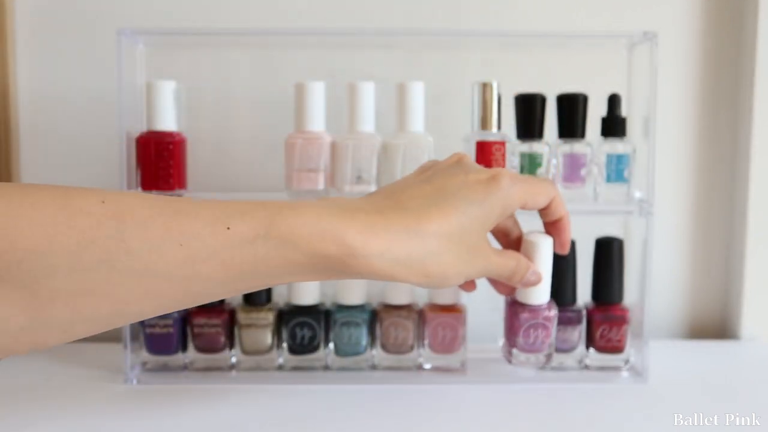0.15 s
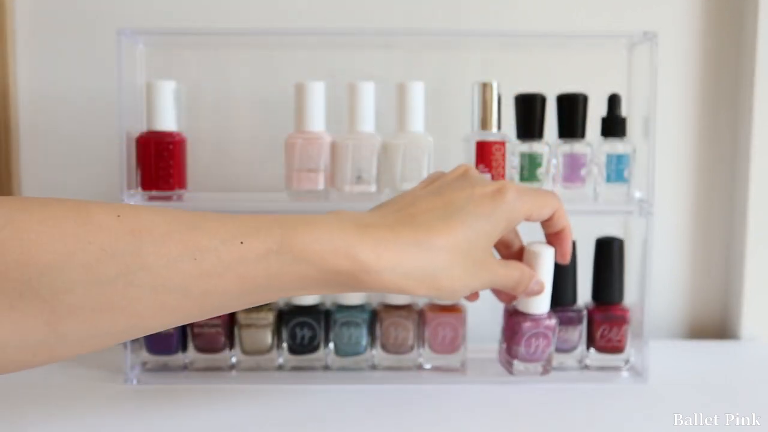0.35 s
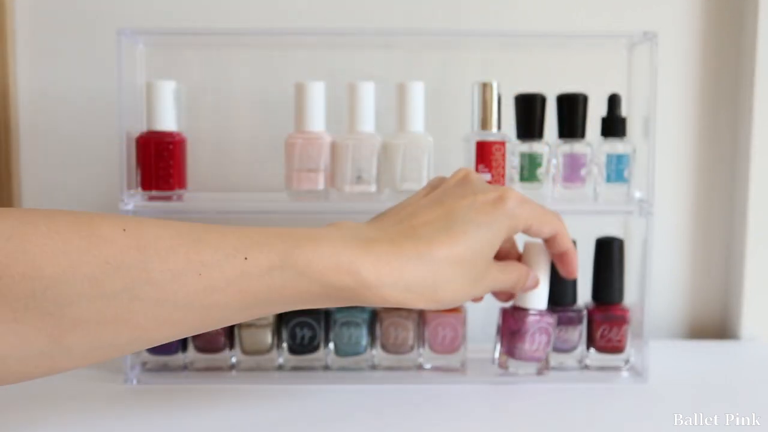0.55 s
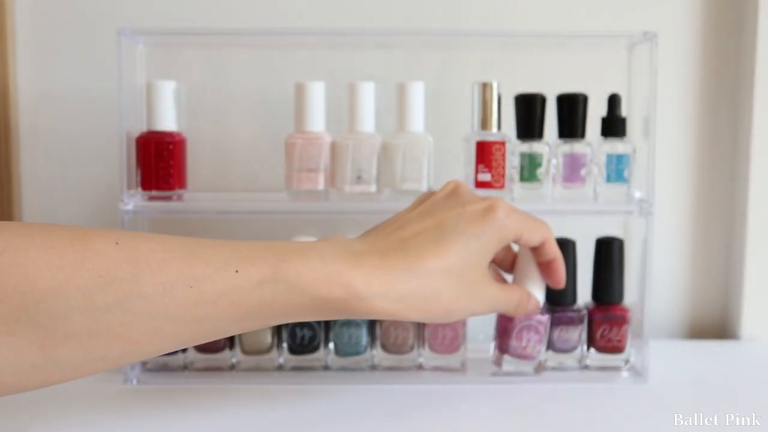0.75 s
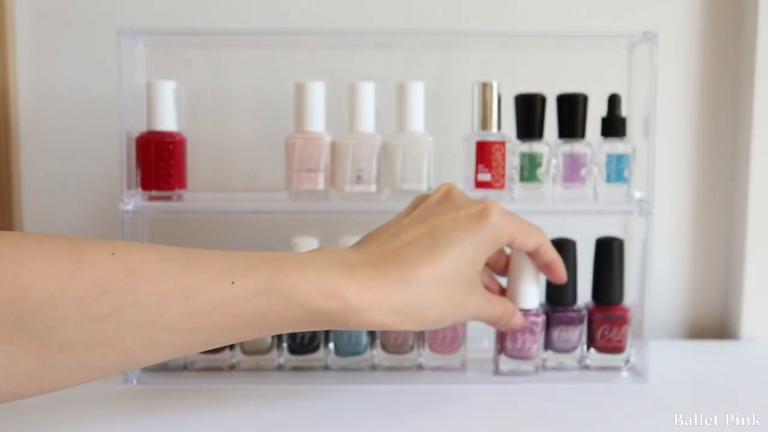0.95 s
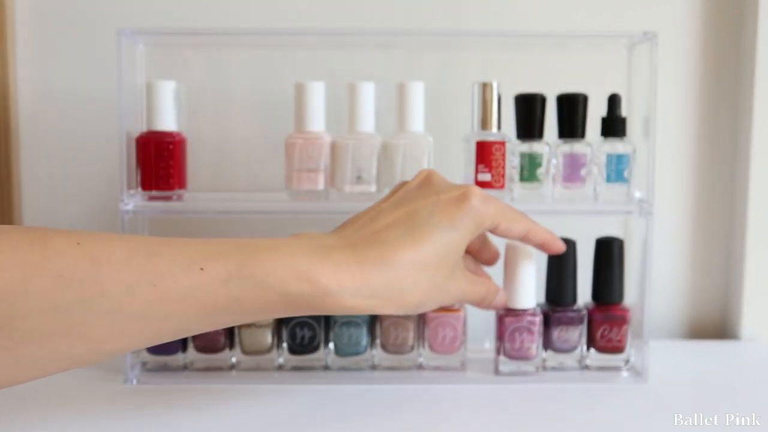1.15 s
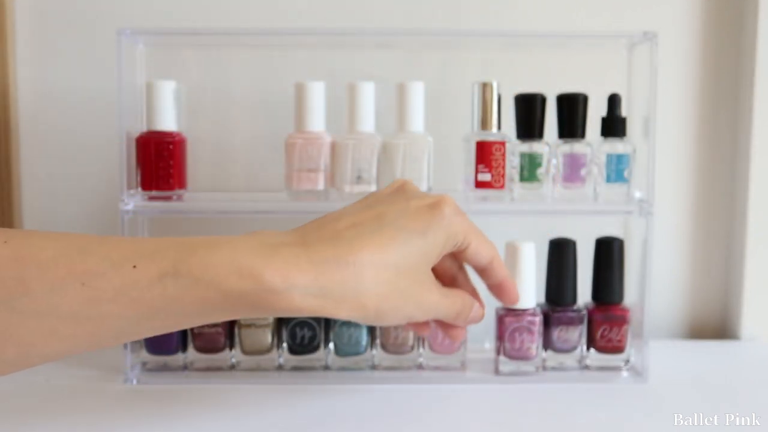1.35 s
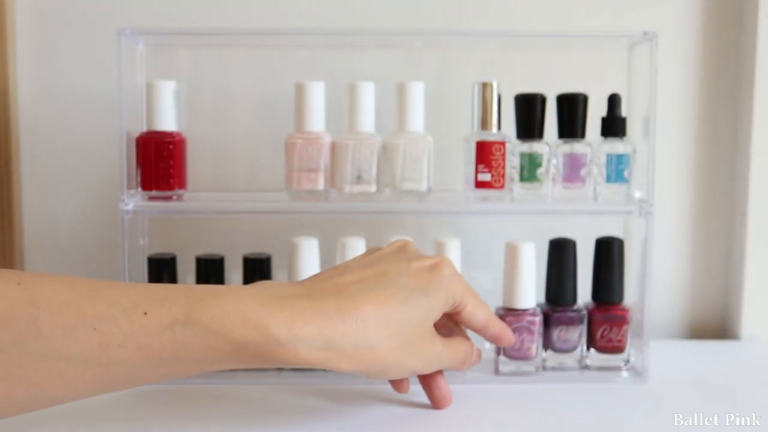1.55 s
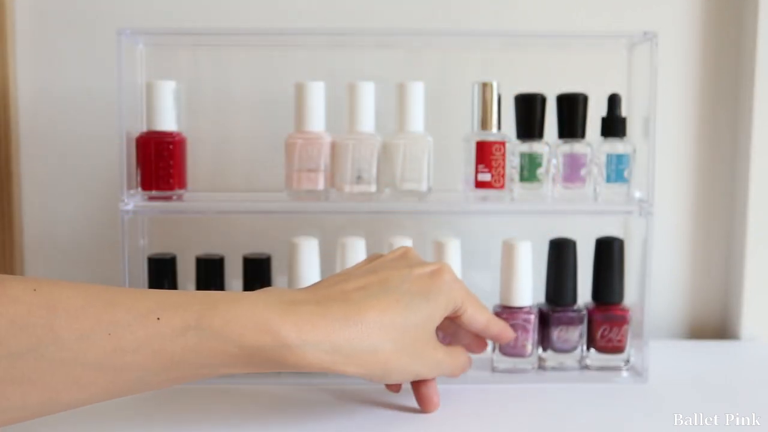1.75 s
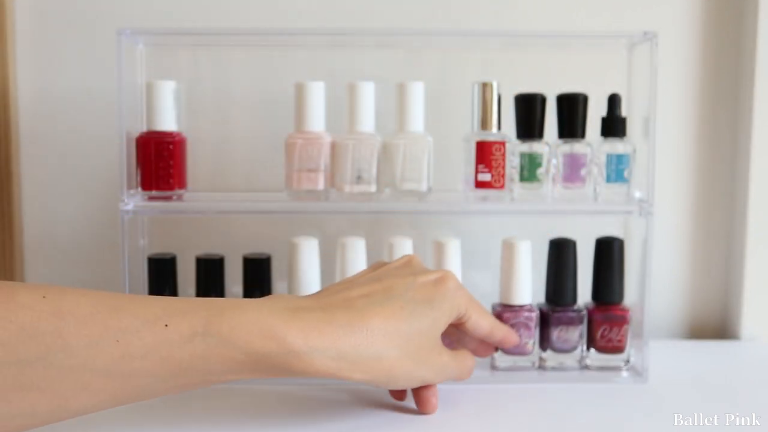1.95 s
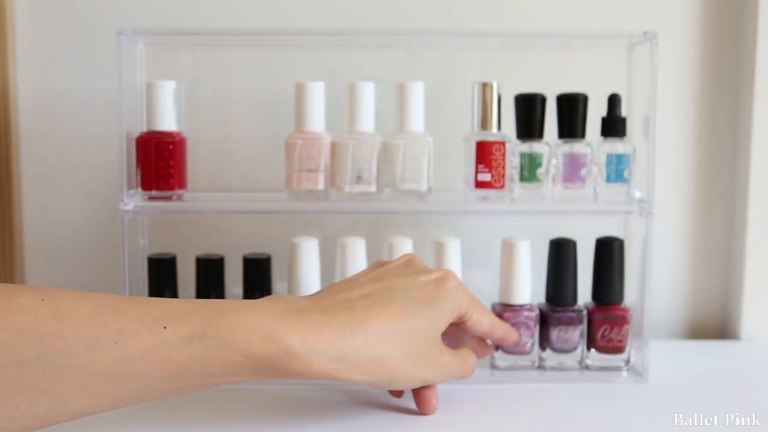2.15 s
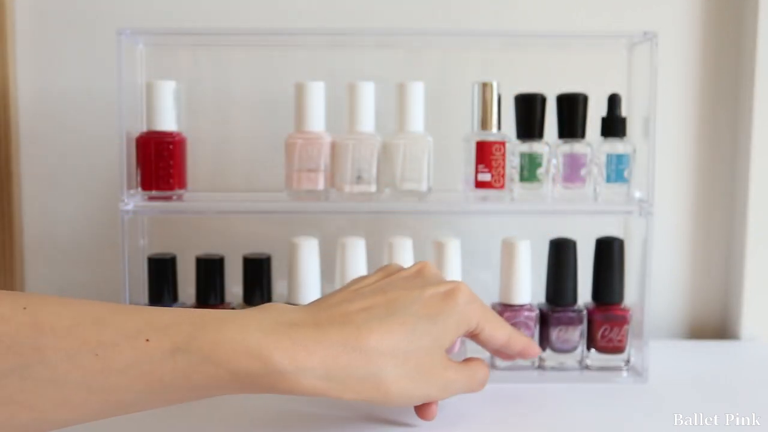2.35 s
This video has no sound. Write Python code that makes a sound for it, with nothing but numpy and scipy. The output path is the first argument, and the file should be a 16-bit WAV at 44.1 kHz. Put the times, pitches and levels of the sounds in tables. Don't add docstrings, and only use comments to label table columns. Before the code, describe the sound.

Glass bottle knocks against a hollow plastic shelf, sharp clicks and soft thuds in a quiet room

```python
import sys
import numpy as np
from scipy import signal
from scipy.fft import rfft, irfft
from scipy.io import wavfile

SR = 44100
rng = np.random.default_rng(int(sys.argv[2]) if len(sys.argv) > 2 else 0)


def amplitude_ratio(level_db):
    exponent = np.asarray(level_db, float) / 20
    return 10 ** exponent


def output_pcm(signal):
    pcm = np.clip(np.atleast_2d(signal).T, -1, 1) * 32767
    wavfile.write(sys.argv[1], SR, np.round(pcm).astype(np.int16))


N = 105840


def at_hz(points, hz):
    points = np.array(points)
    return np.interp(np.log(hz), np.log(points[:, 0]), points[:, 1])


def ring(x, hz, t60):
    radius, angle = amplitude_ratio(-60 / (t60 * SR)), 2 * np.pi * hz / SR
    return signal.lfilter([0, np.sin(angle)], [1, -2 * radius * np.cos(angle), radius ** 2], x + 1e-18)


def band(x, low_hz, high_hz):
    return signal.sosfilt(signal.butter(2, [low_hz, high_hz], "band", fs=SR, output="sos"), x)


def add(out, s, sound):
    i = int(s * SR)
    out[i:i + len(sound)] += sound[:len(out) - i]


# [t/s, knock level/dB, knock f/Hz, glass crack
# level/dB, shelf level/dB]
CONTACTS = [(.2372, -14, 2245, -21, -48.5), (.240, -19.5, 881, -37, -41), (0.253, -26, 2270, -31, -31.5),
            (0.3794, -6, 1587, -19.5, -24), (.384, -11, 896, -21, -25.5), (0.7697, -30.5, 795, -59.5, -55),
            (.7705, -41.5, 1834, -61.5, -73), (1.1375, -14.5, 855, -46, -34),
            (1.139, -19, 2010, -38.5, -37), (1.1483, -13, 877, -36, -30), (1.150, -17.5, 1985, -47, -62),
            (1.174, -18, 992, -40.5, -36), (1.7382, -14.5, 2074, -24, -37), (1.7449, -16, 860, -28, -36.5),
            (1.749, -23, 417, -38.5, -40.5), (2.0866, -24, 513, -51, -49), (2.089, -16, 970, -62, -45),
            (2.09, -21, 1770, -74.5, -58.5), (2.093, -40.5, 2640, -64.5, -52),
            (2.108, -45, 3100, -58, -42), (2.112, -22, 960, -70, -64), (2.213, -35, 430, -63, -48),
            (2.2197, -29.5, 870, -60, -51), (2.221, -42, 1930, -59, -59),
            (0.069, -55, 1180, -69, -63.5), (0.204, -50, 1200, -82, -60),
                 (.2378, -20.5, 4420, -70, -62), (.546, -38, 914, -56, -44.5),
                 (.635, -45.5, 1920, -59, -48), (0.6912, -34.5, 2250, -58, -56.5),
                 (0.729, -41.5, 540, -77.5, -55.5), (0.938, -38.5, 1023, -56.5, -45.5),
                 (.948, -36, 2280, -59.5, -51.5), (.949, -44.5, 3860, -70, -71.5),
                 (1.054, -50.5, 1900, -72.5, -61), (1.113, -35, 1840, -53.5, -56.5),
                 (1.128, -42, 1900, -80.5, -43.5), (1.1389, -40.5, 2630, -63, -70.5),
                 (1.149, -42, 3800, -62, -74.5), (1.723, -51, 814, -52, -51.5),
                 (1.741, -26, 2890, -59.5, -68.5), (1.842, -38.5, 2280, -42, -42.5),
                 (2.063, -58, 864, -63.5, -57.5), (2.170, -32.5, 842, -81, -43.5),
                 (2.240, -41, 321.6, -68, -72), (2.253, -58.5, 890, -87.5, -60)]
# [f/Hz, level/dB, t60/s]
SHELF_MODES = [(244.3, -17, 0.32), (316.5, -10, 0.11), (400, -3.5, 0.073), (460, -9.5, 0.12),
               (524.4, -2, .1), (693, -7.5, 0.085), (795, -2.5, 0.074), (884, -11, 0.26), (950, -4, 0.076),
               (1004, -11, .15), (1185, -4.5, 0.084), (1254.6, -10, 0.15), (1423, -8, 0.053),
               (1653, -5.5, 0.047)]
# [f/Hz, level/dB, t60/s]
GLASS_MODES = [(2480, -5, 0.0088), (3300, -6, 0.019), (3800, -7, .01), (4420, -9, 0.0059),
               (6750, -5.5, .008), (7700, -12.5, .006), (9900, -7.5, .006)]
KNOCK_CYCLES = 16.84
SPREAD_DB = 4.5
CRACK_LOW_HZ, CRACK_TOP_HZ = 1710, 7200
CRACK_S, RATTLE_S, RATTLE_DB = 0.0015, 0.033, -14.5


def contacts():
    out, t = np.zeros(N), np.arange(SR // 2) / SR
    click = 1. * (t == 0)
    shelf = band([amplitude_ratio(db) * ring(click, hz, t60) for hz, db, t60 in SHELF_MODES], 220, 3300)
    shelf = shelf * (1 - np.exp(-t / 0.00094))
    glass = np.array([amplitude_ratio(db - 3) * ring(click, hz, t60) for hz, db, t60 in GLASS_MODES])
    for s, db, hz, crack_db, shelf_db in CONTACTS:
        shelf_gains = amplitude_ratio(SPREAD_DB * rng.standard_normal(len(shelf)))
        glass_gains = amplitude_ratio(SPREAD_DB * rng.standard_normal(len(glass)))
        knock = ring(click, hz, KNOCK_CYCLES / hz)
        knock = band(knock * (1 - np.exp(-t * hz / 0.26)), 0.64 * hz, 1.496 * hz)
        decay = 0.54 * np.exp(-t / CRACK_S) + amplitude_ratio(RATTLE_DB) * np.exp(-t / RATTLE_S)
        rattle = rng.standard_normal(len(t)) * decay
        crack = band(2.0 * click + rattle + glass_gains @ glass, CRACK_LOW_HZ, CRACK_TOP_HZ)
        shake = shelf_gains @ shelf
        add(out, s, amplitude_ratio(db) * knock + amplitude_ratio(crack_db) * crack + amplitude_ratio(shelf_db) * shake)
    return out


# [t/s, level/dB, low f/Hz, top f/Hz]
LIP_SNAPS = [(.2374, -13.5, 1900, 4800), (.2385, -20, 5870, 9600), (.2435, -25, 5900, 8500),
             (.254, -20.5, 1810, 4900), (.3797, -12, 1670, 3017), (.3800, -15.5, 5300, 12300),
             (.3815, -16.5, 3510, 5100), (.3832, -15, 5460, 12500), (.7698, -36.5, 288, 1080),
             (.772, -53, 2243, 3300), (1.1378, -36, 2173, 3000), (1.149, -49.5, 9000, 10600),
             (1.7385, -14, 2100, 4860), (1.739, -27.5, 8000, 11730), (1.7445, -21.5, 2500, 6500),
             (1.7495, -29.5, 8960, 11900), (1.8415, -31, 1200, 4540), (1.843, -33.5, 1500, 4000),
             (2.0895, -48, 8400, 10570), (2.109, -49, 8500, 10000)]
SNAP_S = .0008


def snaps():
    out, t = np.zeros(N), np.arange(SR // 20) / SR
    for s, db, low_hz, top_hz in LIP_SNAPS:
        spit = 3.0 * (t == 0) + rng.standard_normal(len(t)) * np.exp(-t / SNAP_S)
        snap = band(band(spit, low_hz, top_hz), low_hz, top_hz)
        add(out, s, amplitude_ratio(db - 3) * snap / np.abs(snap).max())
    return out


# [t/s, level/dB, f/Hz, t60/s]
JOLTS = [(0.212, -53, 198, 0.039), (.238, -23.5, 4420, 0.016), (.2378, -18, 2135, .02),
         (.7699, -36.5, 794, 0.036), (1.1378, -33.5, 2640, .025), (1.138, -29, 1895, 0.043),
         (1.149, -41.5, 3850, 0.026), (2.0872, -25.5, 784, 0.054), (2.089, -35, 1398, 0.038),
         (2.089, -46, 2650, .04), (2.088, -50, 3110, 0.027), (2.108, -42, 3170, 0.02),
         (2.2194, -33.5, 880, 0.052), (2.222, -51, 1940, 0.036), (2.25, -42, 881, 0.081),
         (2.24, -43, 330, .04), (.239, -30.5, 460, 0.11), (.2395, -28.5, 937, 0.11),
         (0.3803, -24.5, 1648, .05), (.381, -25.5, 952, 0.1), (0.771, -45.5, 875, 0.073),
         (1.138, -34, 797, .06), (1.1375, -35.5, 612, .06), (1.741, -31, 900, 0.067),
         (0.239, -46.5, 133, 0.074), (0.38, -29.5, 135.6, 0.16), (0.383, -41.5, 68, 0.23),
         (0.635, -50, 132, 0.14), (0.729, -53.5, 134.3, 0.15), (0.939, -52.5, 137.4, 0.19),
         (.95, -46, 1071, 0.16), (1.143, -35.5, 290, .15), (1.144, -38, 136.6, 0.19),
         (1.635, -32, 159.3, 0.033), (1.741, -49, 137, 0.15), (2.087, -24.5, 548, 0.053),
         (2.0876, -23.5, 921, 0.047), (2.088, -48, 139, 0.13), (2.217, -48, 139.6, 0.17)]


def jolts():
    out = np.zeros(N)
    click = 1. * (np.arange(SR // 2) == 0)
    for s, db, hz, t60 in JOLTS:
        add(out, s, amplitude_ratio(db) * band(ring(click, hz, t60), .5 * hz, 1.66 * hz))
    return out


# [start t/s, length t/s, level/dB, centre f/Hz, width f/Hz]
BASE_DRAGS = [(0, .2, -67.5, 855, 1487), (0.193, 0.053, -64, 3000, 5000), (0.531, 0.094, -48, 900, 203),
              (0.639, 0.16, -60, 335, 295), (0.938, 0.048, -51.5, 1050, 400), (0.942, 0.068, -54, 362, 246),
              (1.114, 0.012, -49.5, 1200, 1520), (1.629, 0.076, -68, 490, 590),
              (1.695, 0.031, -63.5, 4000, 8100), (2.029, 0.12, -68, 880, 1200),
              (2.202, 0.041, -53.5, 400, 400)]
GRAIN_DB = 3.5


def scrapes():
    out = np.zeros(N)
    for s, length, db, hz, width_hz in BASE_DRAGS:
        grains = rng.standard_normal(SR // 4) * amplitude_ratio(GRAIN_DB * rng.standard_normal(SR // 4))
        low_hz = np.sqrt(hz ** 2 + width_hz ** 2 / 4) - width_hz / 2
        rub = band(grains, low_hz, low_hz + width_hz)[:int(length * SR)]
        stroke = np.sqrt(np.sin(np.linspace(0, np.pi, len(rub))).clip(0))
        add(out, s, amplitude_ratio(db) * rub / rub.std() * stroke)
    return out


# [centre t/s, half length t/s, level/dB]
FINGER_BRUSHES = [
    (0.022, 0.11, -67),
    (0.237, 0.054, -60.5),
    (0.66, 0.02, -73.5),
    (1.35, 0.031, -67),
    (1.719, 0.024, -73),
    (2.1, 0.022, -70),
]
BRUSH_HZ, BRUSH_WIDTH_HZ = 8000, 2300


def brushes():
    t = np.arange(N) / SR
    swell = sum(amplitude_ratio(db) * np.exp(-((t - s) / half) ** 2) for s, half, db in FINGER_BRUSHES)
    noise = band(rng.standard_normal(N), BRUSH_HZ - BRUSH_WIDTH_HZ / 2, BRUSH_HZ + BRUSH_WIDTH_HZ / 2)
    return swell * noise / noise.std()


# [f/Hz, t60/s]
ROOM_DECAY = [(100, 0.49), (500, 0.29), (1000, .26), (2000, 0.28), (6000, 0.34), (10000, 0.27),
              (14000, 0.12)]
# [f/Hz, level/dB]
ROOM_TONE = [(100, -6.0), (200, -4), (400, -0.5), (900, -2), (2000, -1), (5000, -2.25), (10000, -1.5),
             (14000, -1.3)]
WALL_S, WALL_DB, TAIL_DB = 0.016, -11.5, -2.5


def room(x):
    t = np.arange(SR // 2) / SR
    edges = 60 * 2 ** np.arange(0, 8.6, .5)
    white = rng.standard_normal((2, len(t)))
    tail = np.zeros(len(t))
    for k, (low_hz, high_hz) in enumerate(zip(edges, edges[1:])):
        t60 = at_hz(ROOM_DECAY, np.sqrt(low_hz * high_hz))
        tail += band(white[k % 2], low_hz, high_hz) * amplitude_ratio(-60 * t / t60)
    tail = tail * (1 - np.exp(-(t / .005) ** 2))
    tail = amplitude_ratio(TAIL_DB) * tail / np.sqrt(np.sum(tail ** 2))
    hz = np.maximum(np.fft.rfftfreq(len(t), 1 / SR), 1)
    tail = irfft(rfft(tail) * amplitude_ratio(at_hz(ROOM_TONE, hz)), len(t))
    tail[int(WALL_S * SR)] += amplitude_ratio(WALL_DB)
    return signal.fftconvolve(x, tail)[:N]


# [f/Hz, level/dB]
HISS_TONE = [(25, 3.5), (60, 11.5), (120, 7.5), (400, 1), (1000, -6), (3000, -10), (8000, -11.5),
             (16000, -11)]
HISS_DB = -67


def hiss():
    hz = np.maximum(np.fft.rfftfreq(N, 1 / SR), 1)
    noise = irfft(rfft(rng.standard_normal(N)) * amplitude_ratio(at_hz(HISS_TONE, hz)) * (hz < 16000), N)
    return amplitude_ratio(HISS_DB) * noise / noise.std()


def scene():
    near = contacts() + snaps() + jolts() + scrapes() + brushes()
    near = signal.sosfilt(signal.butter(4, 11800, fs=SR, output="sos"), near)
    return (near + room(near) + hiss())[None]


def roll_off(x):
    return signal.sosfilt(signal.butter(12, 16310, fs=SR, output="sos"), x)


def record(dry):
    dry = signal.sosfilt(signal.butter(1, 40, "high", fs=SR, output="sos"), dry)
    mix = signal.sosfilt(signal.cheby2(12, 60, 16300, fs=SR, output="sos"), dry)
    return roll_off(mix)


dry = scene()
out = record(dry)
output_pcm(out)
```